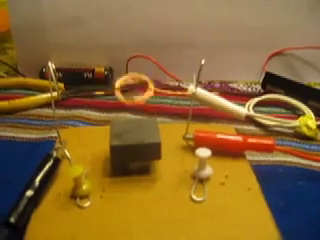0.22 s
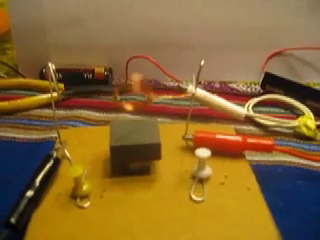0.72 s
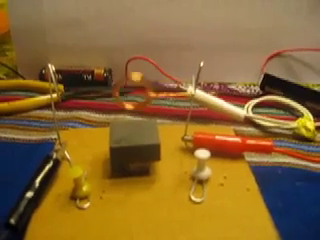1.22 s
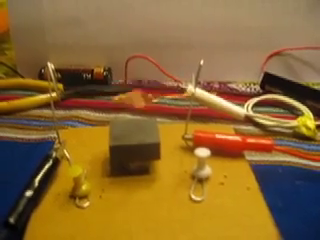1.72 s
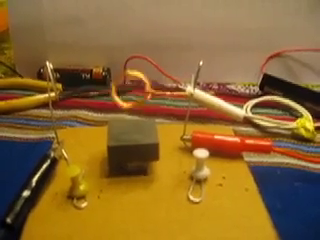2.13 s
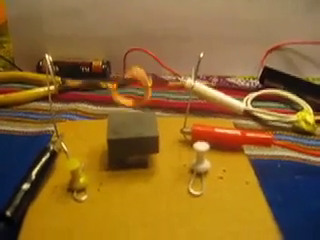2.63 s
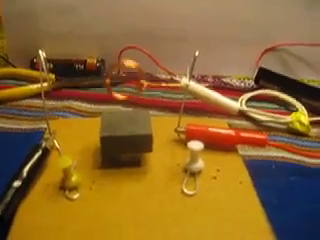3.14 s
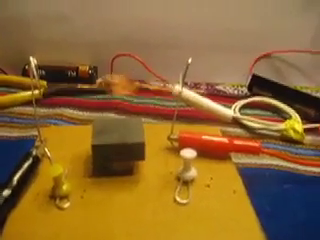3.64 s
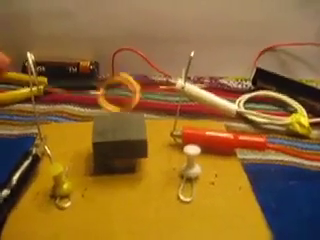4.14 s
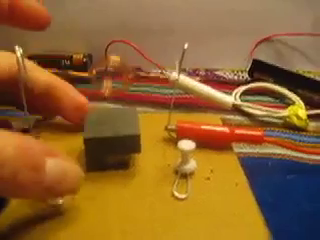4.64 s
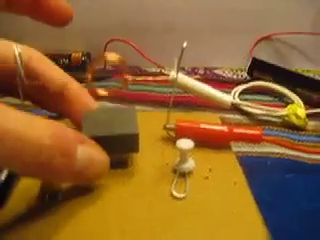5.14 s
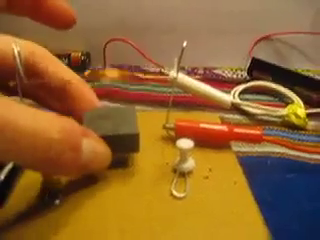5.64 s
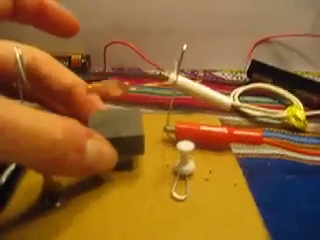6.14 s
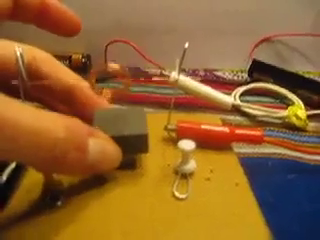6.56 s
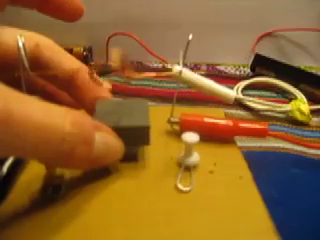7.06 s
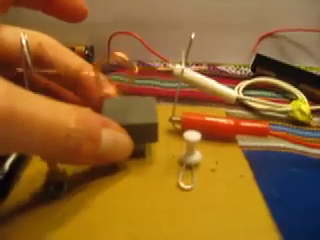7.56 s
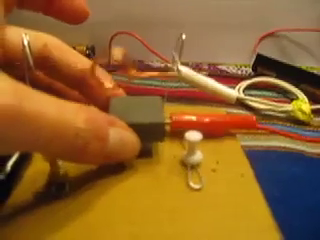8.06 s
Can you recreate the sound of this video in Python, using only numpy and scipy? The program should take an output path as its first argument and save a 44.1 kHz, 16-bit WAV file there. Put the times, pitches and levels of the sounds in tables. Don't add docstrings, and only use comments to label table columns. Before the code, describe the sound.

A steady soft microphone hiss lies under everything. From 0 s a light wire coil turns on thin metal supports on a cardboard base, very close, with hardly any room echo. Roughly every 0.2 s comes a small cluster: a bright thin tick, a duller rebound about 20 ms later, a fainter double and tiny ticks, a woody knock, then a brief gritty scrape swelling and stopping abruptly before the next tick. The pace is fairly even until about 2 s, then limps, with gaps of 0.2 to 0.35 s until about 4.3 s. From 4.7 s the landings are mostly harder and crisper, the scrapes thinner and wirier, at a steadier four or so turns a second, with a longer gap near 7.3 s. At 7.9 s one far louder, hard metallic snap cracks out, with a short rub trailing. A quick flurry of light knocks around 8.1 s and faint scrapes end it.

```python
import sys
import numpy as np
from scipy import signal
from scipy.fft import rfft, irfft
from scipy.io import wavfile
from scipy.ndimage import uniform_filter1d

SR = 44100
rng = np.random.default_rng(int(sys.argv[2]) if len(sys.argv) > 2 else 0)


def unload_audio(sound):
    columns = np.transpose(np.atleast_2d(sound))
    steps = np.round(np.clip(columns, -1, 1) * 32767)
    wavfile.write(sys.argv[1], SR, steps.astype(np.int16))


def gain_from_db(level_db):
    decades = np.asarray(level_db, float) / 20
    return 10 ** decades


N = 366912

# (frequency [Hz], density [dB per Hz])
HISS_SPECTRUM = [(25, -6), (250, -2.5), (1000, -4.5), (3500, -11), (6000, -12.5), (7400, -21),
                 (9000, -17.5), (15500, -21.5)]
HISS_DB = -54.5

# (frequency [Hz], width [Hz], level [dB])
BASE_MODES = [(589, 104, 2), (1110, 186, 6), (810, 470, -3), (1515, 2500, -2.5)]
# (frequency [Hz], width [Hz], level [dB])
BOARD_MODES = [(1545, 45, -4), (1976, 155, -5.5), (2758, 1280, -4), (3320, 1030, 0), (3603, 187, -0.5),
               (4098, 300, 0.5), (5020, 800, -4.5), (8614, 135, -2)]
# (frequency [Hz], width [Hz], level [dB])
SUPPORT_MODES = [(5850, 590, 11), (6230, 450, 9.5), (6580, 570, 7.3)]
# (frequency [Hz], width [Hz], level [dB])
WIRE_MODES = [(8560, 880, -3.5), (9670, 460, -1), (11060, 1660, 0), (12880, 1010, -0.5), (13800, 600, -6),
              (15140, 630, -4)]

# (landing time [s], landing level on wire [dB], rebound delay [s],
# rebound level [dB], level of the rebound's double [dB])
TURNS_FREE = [(-.018, -54, 0.018, -26, -34), (.202, -34, 0.023, -35.5, -41),
              (0.4057, -33.5, 0.022, -35.5, -37), (0.6074, -28, 0.018, -30, -36.5),
              (.823, -31.5, 0.02, -36, -37.5), (1.035, -34, 0.019, -35.5, -39),
              (1.231, -34.5, 0.02, -31.5, -36), (1.434, -35.5, 0.022, -29.5, -35),
              (1.6398, -31, 0.023, -34.5, -41), (1.8369, -34, 0.02, -39, -37),
              (2.1351, -32.5, 0.024, -32, -34.5), (2.367, -32.5, 0.024, -39, -40),
              (2.71, -34.5, 0.022, -34.5, -61), (2.9166, -29.5, .0204, -37, -34.5),
              (3.1464, -33.5, .0166, -29.5, -34.5), (3.3986, -33.5, 0.023, -34, -40),
              (3.7355, -31, 0.021, -37, -36), (4.0773, -40, .0218, -34, -53),
              (4.2923, -37.5, 0.023, -33.5, -60), (4.496, -43, .019, -32.5, -33.5)]
# (landing time [s], landing level on wire [dB], rebound delay [s],
# rebound level [dB], level of the rebound's double [dB])
TURNS_HELD = [(4.7204, -26.5, 0.026, -34, -35.5), (4.9569, -39, 0.022, -35.5, -58),
              (5.1529, -30, 0.021, -32.5, -48), (5.3751, -29, 0.027, -33.5, -67),
              (5.601, -29.5, 0.02, -33.5, -34.5), (5.8334, -29, 0.028, -35, -59),
              (6.059, -27.5, 0.02, -37, -34), (6.2709, -25.5, 0.021, -35, -36),
              (6.4918, -28.5, 0.022, -38, -38), (6.7084, -27.5, 0.023, -45, -34.5),
              (6.9339, -30, 0.023, -39.5, -34.5), (7.1647, -29.5, 0.022, -37.5, -33),
              (7.494, -28.5, 0.018, -41, -34.5), (7.7034, -29.5, 0.019, -39, -32.5)]
LAND_BOARD_DB, LAND_SUPPORT_FREE_DB, LAND_SUPPORT_HELD_DB = -43.5, 2.5, -5
SLOW_REBOUND_S = 0.0222
OTHER_END_S, OTHER_END_DB, SKIP_S, SKIP_DB = 0.0022, -6.5, -0.018, -8
FLUTTER_S, DOUBLE_S, THIRD_S = -0.009, 0.0079, 0.0222
UNSTEADY_FROM_S, THIRD_STEADY_DB, THIRD_UNSTEADY_DB = 2.8, -36, -41.5
TICK_FROM_S, TICK_TO_S, TICK_DB = 0.012, 0.065, -52
THUD_S, THUD_DB, THUD_PER_DB, THUD_AGAIN_DB = 0.00208, -41.5, 0.38, -8

# (time [s], board level [dB], brightness [dB])
KNOCKS_FREE = [(.039, -39, 3), (0.264, -46, 6), (0.4602, -38, -11), (0.5912, -40, 12), (0.6728, -34, -6),
               (0.8733, -35.5, -2), (.8932, -44, -5), (1.0889, -33, -9), (1.2945, -37, -6),
               (1.3028, -40, 0), (1.5053, -39, 2), (1.6973, -33, -7), (1.8946, -32, -13), (2.012, -37, -5),
               (2.123, -42, 9), (2.2093, -34, -7), (2.4376, -31.5, -11), (2.6169, -34.5, 13),
               (2.964, -41, 2), (2.9778, -30, -5), (2.9991, -35, -2), (3.207, -37, 0.5), (3.5137, -36, 0.5),
               (3.5488, -37.5, 1.5), (3.5585, -39, -2), (3.787, -36.5, -3), (4.147, -33.5, -1),
               (4.3595, -31.5, 1), (4.4577, -40.5, -5), (4.5567, -37, -12)]
# (time [s], board level [dB], brightness [dB])
KNOCKS_HELD = [(4.727, -33, 11.5), (4.7692, -34, -4), (4.7891, -33, -3), (4.9519, -30.5, -3),
               (5.0201, -30.5, 2), (5.2113, -35.5, -6), (5.6544, -40, 1), (5.897, -38, 0),
               (6.1125, -34, -1), (6.1383, -36.5, 0.5), (6.324, -32.5, 0), (6.3497, -37, 2),
               (6.5286, -37.5, 4), (6.557, -38, 0), (6.7691, -33.5, 0), (6.7948, -38, -5),
               (6.9908, -37.5, -8), (6.997, -45, -1), (7.225, -33, -3), (7.4877, -42.5, 15.5),
               (7.5476, -31, -7), (7.582, -43.5, 12), (7.7565, -30.5, -16), (7.7746, -39, 0),
               (8.0639, -35, 6.5), (8.075, -41, 1), (8.0839, -38, 3), (8.0952, -40, 2), (8.1081, -42, -2),
               (6.7555, -36, -2)]
# (time [s], board level [dB])
GRAZES = [(.3313, -54), (.6001, -40), (0.8132, -43), (1.2247, -35), (1.431, -37), (1.6314, -50),
          (2.357, -52), (2.7028, -35.5), (2.9075, -45), (3.138, -39), (3.73, -38), (4.069, -39.5),
          (5.594, -34.5), (6.263, -48), (1.7851, -53), (2.039, -49), (4.381, -50), (4.479, -45),
          (4.487, -49), (4.601, -56), (5.044, -45.5), (6.2207, -53), (7.4008, -46), (8.216, -49),
          (8.236, -54), (8.312, -52)]

# (lift-off time [s], level [dB])
DRAGS_FREE = [(.187, -45), (.387, -44.5), (0.582, -45), (0.807, -44), (1.018, -43.5), (1.207, -45),
              (1.413, -45.5), (1.626, -45.5), (1.821, -44), (2.005, -46.5), (2.114, -45.5), (2.343, -45),
              (2.581, -45), (2.641, -50), (2.687, -46), (2.79, -53), (2.899, -45), (3.119, -46.5),
              (3.375, -46), (3.477, -49), (3.712, -42), (3.957, -42.5), (4.052, -47), (4.274, -41.5),
              (4.465, -47)]
# (lift-off time [s], level [dB])
DRAGS_HELD = [(4.702, -41.5), (4.934, -42.5), (5.132, -46.5), (5.354, -42), (5.575, -43.5), (5.811, -43),
              (6.038, -45), (6.256, -45), (6.469, -40), (6.685, -42.5), (6.909, -46.5), (7.141, -44.5),
              (7.369, -46), (7.468, -44.5), (7.68, -44), (7.892, -46), (8.038, -46), (8.136, -52),
              (8.234, -50)]
SWELL_DB_PER_S, SWELL_PER_DB, QUIET_DRAG_DB = 80, 33, -56.5
DRAG_WIRE_FREE_DB, DRAG_WIRE_HELD_DB = -7.5, -4.5

# (frequency [Hz], level [dB])
SNAP_MODES = [(620, -23), (1050, -12), (1400, -10.5), (1900, -9.5), (2500, -12), (3000, -4.5), (3620, 4.5),
              (4170, -3), (4870, 0), (5530, 3.5), (6100, -1.5), (6800, -1.5), (9550, -4)]
SNAP_S, SNAP_DB = 7.8922, -10.5
# (time since snap [s], level [dB])
SETTLING = [(0.003, -37), (0.012, -64), (0.06, -41.5), (0.11, -48.5), (0.15, -58)]
# (frequency [Hz], level [dB])
RUB_SPECTRUM = [(700, -12), (5000, 0.5), (7200, -4.5), (10000, -17)]


def shaped_noise(points, count):
    hz, db = np.transpose(points)
    f_hz = np.fft.rfftfreq(count, 1 / SR)
    gain = gain_from_db(np.interp(np.log(f_hz + 1), np.log(hz), db))
    x = irfft(rfft(rng.standard_normal(count)) * gain, count)
    return x / x.std()


def hiss():
    return gain_from_db(HISS_DB) * shaped_noise(HISS_SPECTRUM, N)


def turn(land_s, land_db, wait_s, rebound_db, double_db, support_db):
    back_s = land_s + wait_s
    third_db = THIRD_STEADY_DB if land_s < UNSTEADY_FROM_S else THIRD_UNSTEADY_DB
    if wait_s > SLOW_REBOUND_S:
        other_s, other_db = back_s + SKIP_S, land_db + SKIP_DB
    else:
        other_s, other_db = land_s + OTHER_END_S, land_db + OTHER_END_DB
    rows = [(other_s, -47, other_db + support_db, other_db),
            (land_s, LAND_BOARD_DB, land_db + support_db, land_db),
            (back_s + FLUTTER_S, -47, -45, land_db - 9.5),
            (back_s, rebound_db, rebound_db + 4, 0.33 * rebound_db - 29),
            (back_s + DOUBLE_S, double_db, double_db - 0.5, double_db - 7),
            (back_s + THIRD_S, third_db, third_db - 5, third_db - 18)]
    when, loudness, colour = rng.random((2, 3)).T
    tick_s = back_s + TICK_FROM_S + (TICK_TO_S - TICK_FROM_S) * when
    tick_db = TICK_DB + 8 * loudness
    bright_db = 8 * (colour - 0.5)
    ticks = np.c_[tick_s, tick_db, tick_db - 5 + bright_db, tick_db - 8.5 + 2 * bright_db]
    return np.r_[rows, ticks]


def contacts():
    rows = [turn(*row, LAND_SUPPORT_FREE_DB) for row in TURNS_FREE]
    rows += [turn(*row, LAND_SUPPORT_HELD_DB) for row in TURNS_HELD]
    s, db = np.transpose(DRAGS_FREE + DRAGS_HELD)
    rows.append(np.c_[s - 0.036, db - 8, db - 8, db - 3])
    s, db = np.transpose(GRAZES)
    rows.append(np.c_[s, db, db + 3, db - 1.5])
    s, db, bright_db = np.transpose(KNOCKS_FREE + KNOCKS_HELD)
    rows.append(np.c_[s, db, db - 7 + bright_db, db - 13 + 1.1 * bright_db])
    rows = np.vstack(rows)
    return rows[rows[:, 0] >= 0].T


def spikes(s, size):
    train = np.zeros(N)
    np.add.at(train, np.clip(np.round(s * SR).astype(int), 0, N - 1), size)
    return train


def ring(modes, s, db, contact_s, strike, rubbing, uneven_db=2.8):
    t = np.arange(512) / SR
    contact = np.minimum(t / (0.096 * contact_s), 1) * np.exp(-(t / contact_s) ** 1.32)
    rough = rng.standard_normal(N)
    _, width_hz, mode_db = np.transpose(modes)
    power = gain_from_db(2 * mode_db) * np.pi * width_hz / (2 * SR)
    favour = gain_from_db(uneven_db * rng.standard_normal((len(s), len(modes))))
    favour /= np.sqrt(favour ** 2 @ power)[:, None]
    rub = rubbing / np.sqrt(power.sum())
    out = np.zeros(N)
    for (hz, width, level_db), share in zip(modes, favour.T):
        hits = spikes(s, gain_from_db(db) * share)
        force = signal.oaconvolve(hits, contact)[:N] + rub
        peak = np.concatenate(signal.iirpeak(hz, hz / width, SR))
        out += gain_from_db(level_db) * signal.sosfilt([peak, peak], strike * hits + force * rough)
    return out


def drag(slips_per_s):
    board, wire = np.zeros(N), np.zeros(N)
    for drags, wire_db in ((DRAGS_FREE, DRAG_WIRE_FREE_DB), (DRAGS_HELD, DRAG_WIRE_HELD_DB)):
        for end_s, db in drags:
            swell_db_per_s = SWELL_DB_PER_S + SWELL_PER_DB * max(db - QUIET_DRAG_DB, 0)
            at = np.arange(round((end_s - 0.15) * SR), min(round((end_s + 0.0067) * SR), N))
            left_s = end_s - at / SR
            climb_db = swell_db_per_s * np.maximum(left_s - 0.018, 0)
            release_db = 3000 * np.maximum(0.006 - left_s, 0)
            force = gain_from_db(db - climb_db - release_db)
            board[at] += force
            wire[at] += force * gain_from_db(wire_db - 5000 * np.maximum(left_s - 0.036, 0))
    slips = rng.exponential(1, N) * (rng.random(N) < slips_per_s / SR)
    grit = 0.7 + 0.45 * signal.lfilter([1], [1, -np.exp(-1 / (0.001 * SR))], slips)
    return board * grit, wire * grit


def thuds():
    land_s, land_db, wait_s, _, double_db = np.transpose(TURNS_FREE + TURNS_HELD)
    s = np.r_[land_s + THUD_S, land_s + wait_s + DOUBLE_S]
    db = np.r_[THUD_DB + THUD_PER_DB * (land_db + 31), THUD_AGAIN_DB + double_db]
    return s, db


def rattle():
    s, board_db, support_db, wire_db = contacts()
    on_board, on_wire = drag(slips_per_s=800)
    board = ring(BOARD_MODES, s, board_db - 0.5, 0.0034, 8.9, gain_from_db(1.5) * on_board)
    support = ring(SUPPORT_MODES, s, support_db - 2, 0.0023, 11.7, gain_from_db(-4) * on_board)
    wire = ring(WIRE_MODES, s, wire_db - 0.5, 0.0023, 11.8, gain_from_db(0.5) * on_wire)
    base = ring(BASE_MODES, *thuds(), 0.0049, 12.3, gain_from_db(-13) * on_board, uneven_db=1)
    return board + support + wire + base


def room(x):
    t = np.arange(SR // 2) / SR
    decay = gain_from_db(-60 * t / 0.26)
    tail = rng.standard_normal(len(t)) * decay * (t > 0.004)
    tail = signal.lfilter(*signal.butter(1, 6000, fs=SR), tail)
    return signal.oaconvolve(x, tail / np.linalg.norm(tail))[:N]


def snap():
    t = np.arange(1024) / SR
    modes = np.zeros(len(t))
    for k, (hz, db) in enumerate(SNAP_MODES):
        damping = np.exp(-(t / (0.0027 + 0.5 / hz)) ** 2)
        modes += (-1) ** k * gain_from_db(db) * np.sin(2 * np.pi * hz * t) * damping
    grit = rng.standard_normal(len(t))
    band = uniform_filter1d(grit, size=3) - uniform_filter1d(grit, size=14)
    crack = gain_from_db(6.5) * band * np.exp(-(t / 0.0018) ** 2)
    push = gain_from_db(-8) * np.exp(-t / 0.00096) * np.sin(2 * np.pi * 330 * t)
    blow = (modes + crack) * np.minimum(t / 0.00024, 1) + push
    out = signal.oaconvolve(spikes(np.array([SNAP_S]), gain_from_db(SNAP_DB)), blow)[:N]
    since_s = np.arange(N) / SR - SNAP_S
    rub_db = np.interp(since_s, *np.transpose(SETTLING), -200, -200)
    return out + gain_from_db(rub_db) * shaped_noise(RUB_SPECTRUM, N)


def scene():
    near = rattle()
    return (hiss() + near + gain_from_db(-20.5) * room(near) + snap())[None]


def roll_off(x):
    return signal.sosfilt(signal.butter(12, 16810, fs=SR, output="sos"), x)


def record(dry):
    notched = signal.lfilter(*signal.iirnotch(7890, 9, SR), dry)
    rounded = 0.8 * np.tanh(notched / 0.8)
    low, full = (signal.oaconvolve(rounded, signal.firwin(301, hz, window=("kaiser", 8), fs=SR)[None], "same")
                 for hz in (15780, 16620))
    top = full - low
    loud = uniform_filter1d(top ** 2, 128) > gain_from_db(2 * -66)
    gate = uniform_filter1d(loud * 1.0, 128)
    return roll_off(low + top * gate)


dry = scene()
out = record(dry)
unload_audio(out)
```